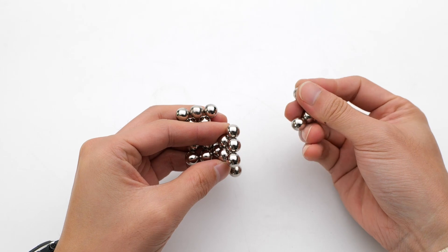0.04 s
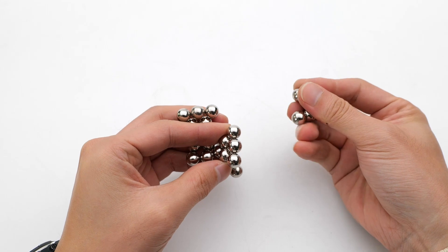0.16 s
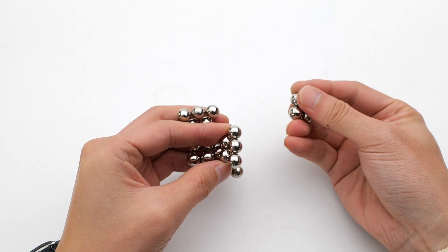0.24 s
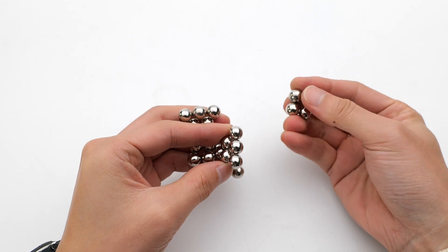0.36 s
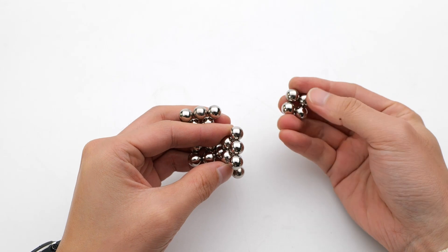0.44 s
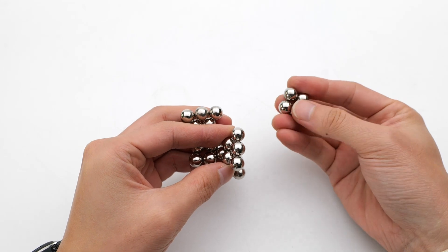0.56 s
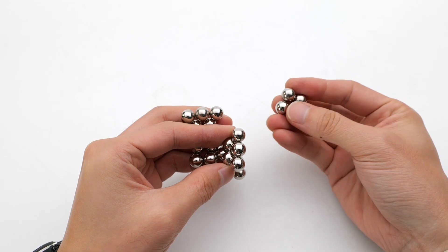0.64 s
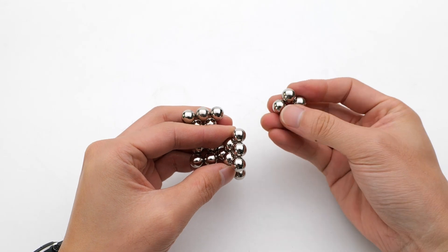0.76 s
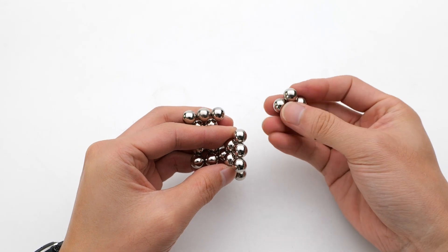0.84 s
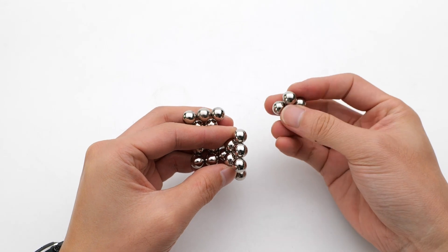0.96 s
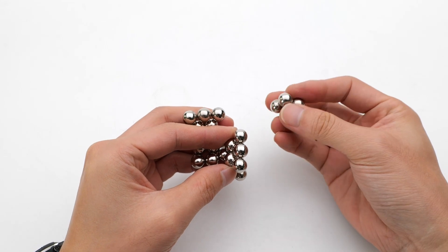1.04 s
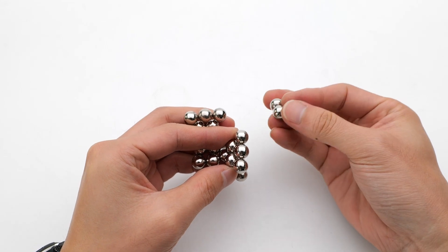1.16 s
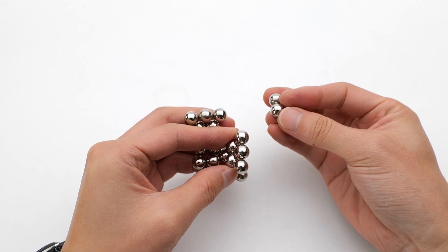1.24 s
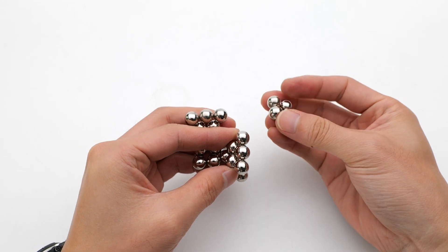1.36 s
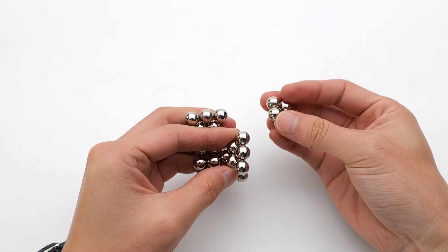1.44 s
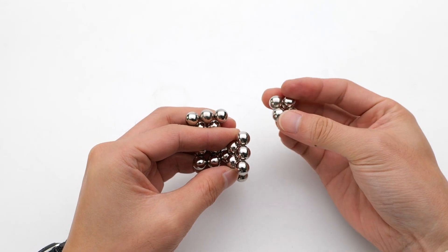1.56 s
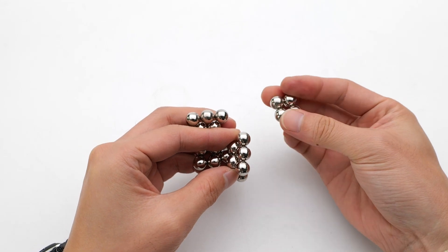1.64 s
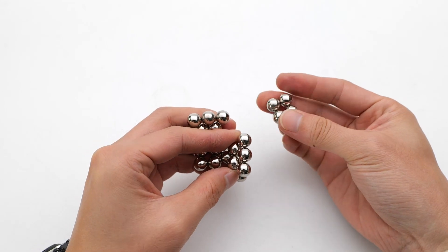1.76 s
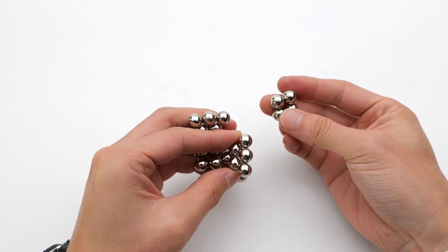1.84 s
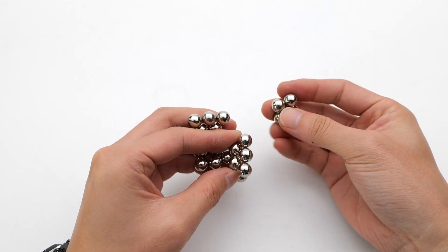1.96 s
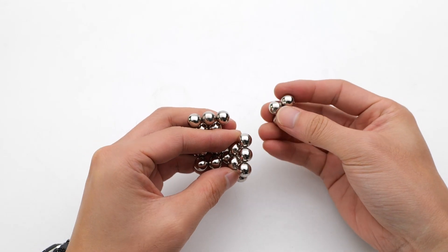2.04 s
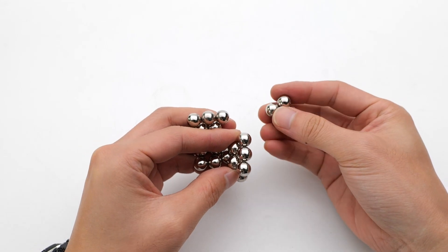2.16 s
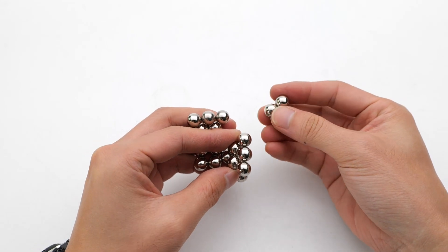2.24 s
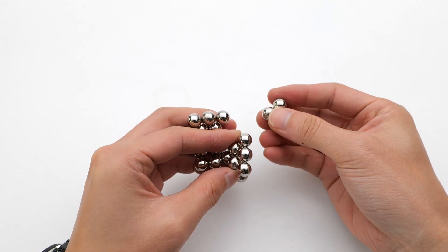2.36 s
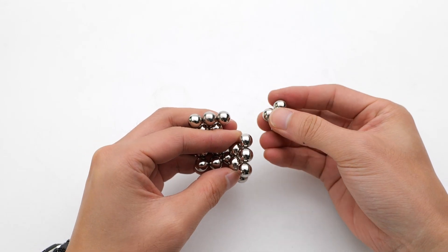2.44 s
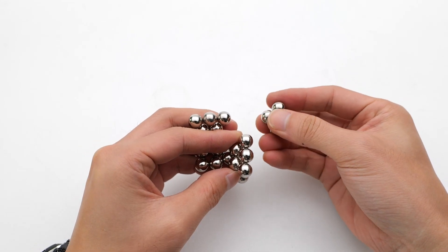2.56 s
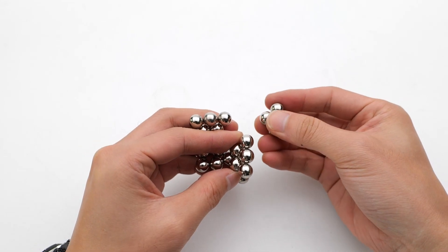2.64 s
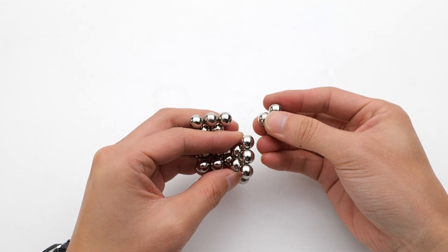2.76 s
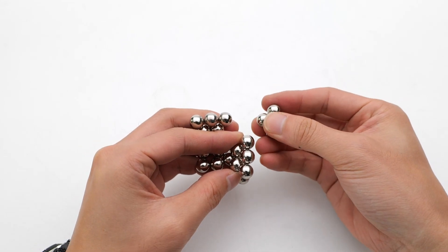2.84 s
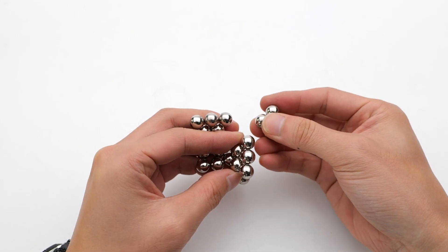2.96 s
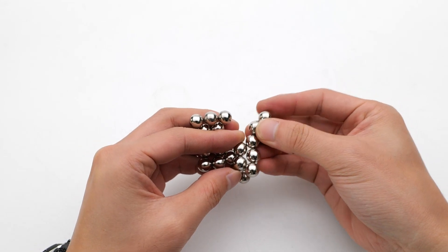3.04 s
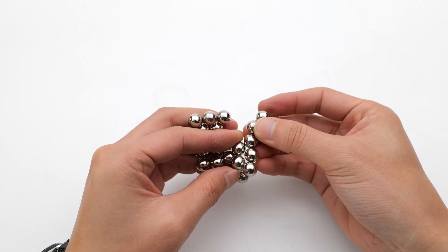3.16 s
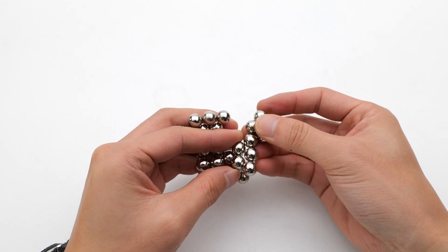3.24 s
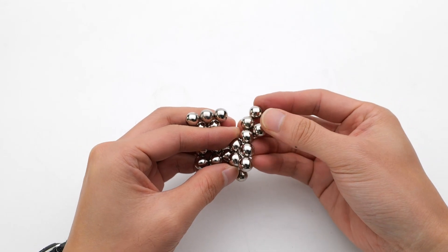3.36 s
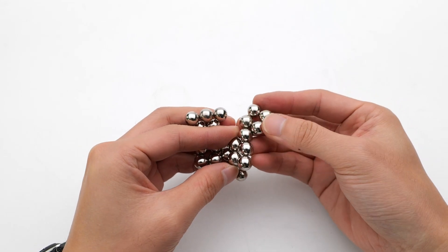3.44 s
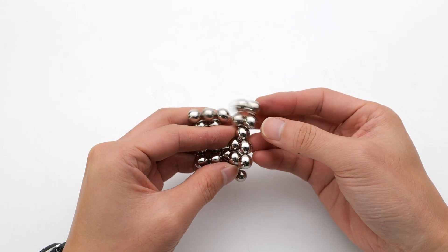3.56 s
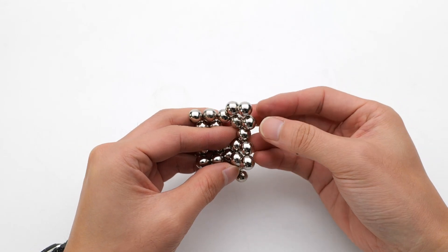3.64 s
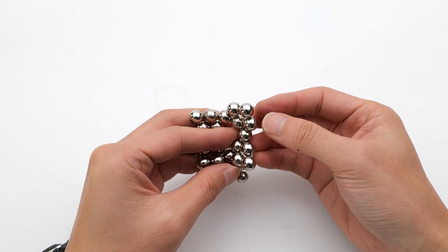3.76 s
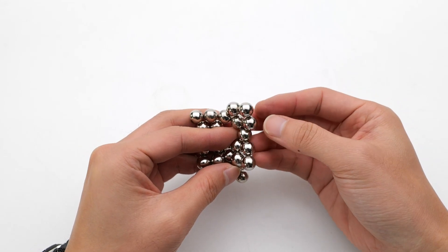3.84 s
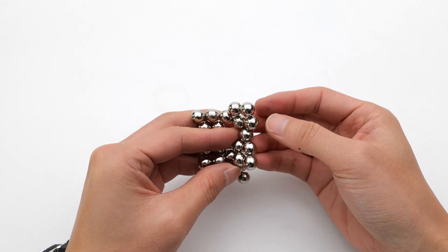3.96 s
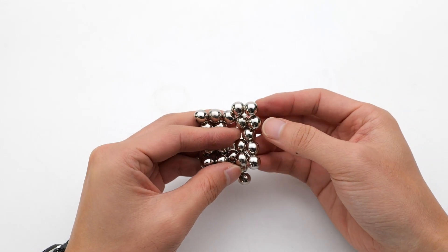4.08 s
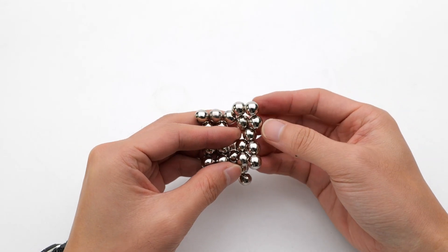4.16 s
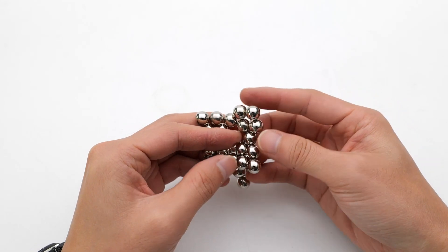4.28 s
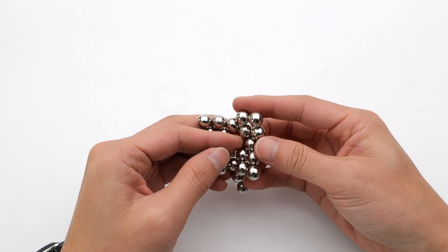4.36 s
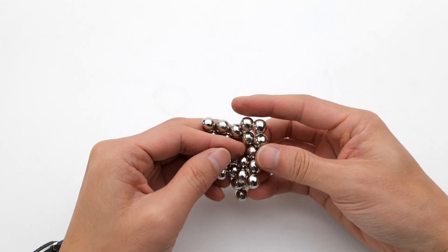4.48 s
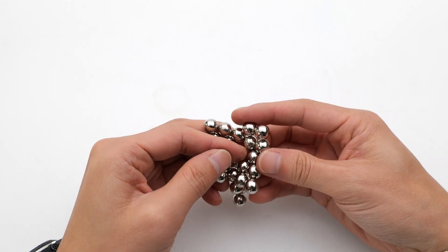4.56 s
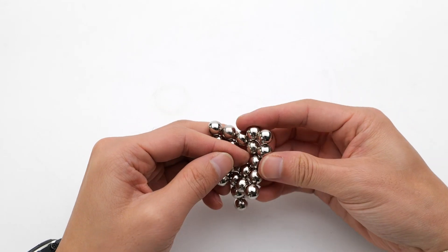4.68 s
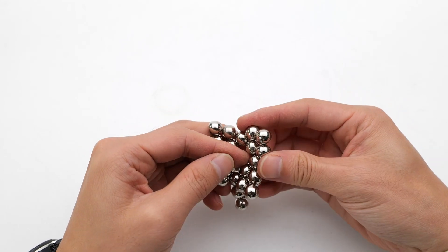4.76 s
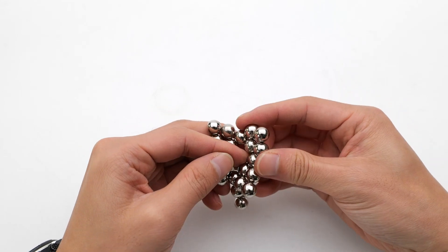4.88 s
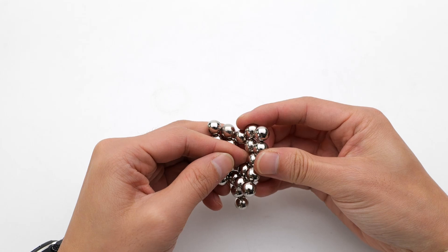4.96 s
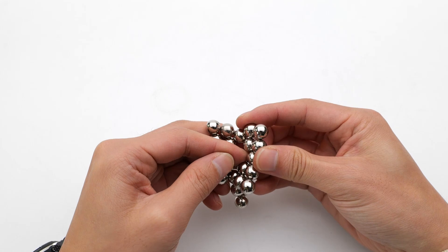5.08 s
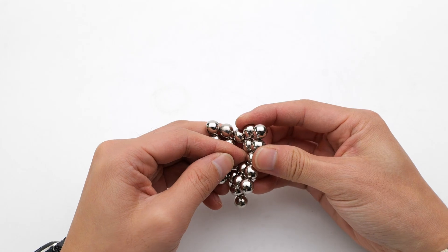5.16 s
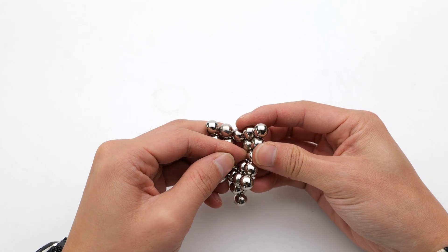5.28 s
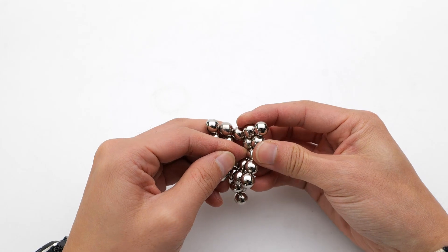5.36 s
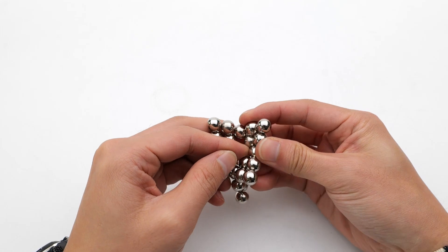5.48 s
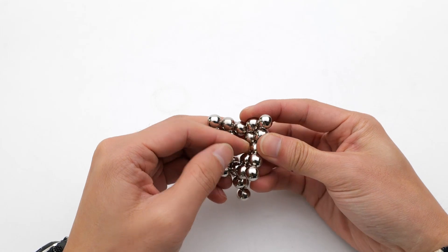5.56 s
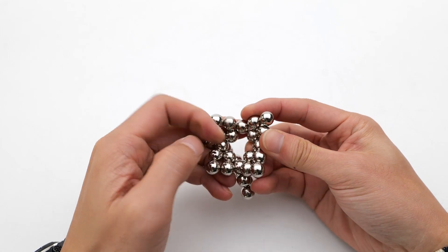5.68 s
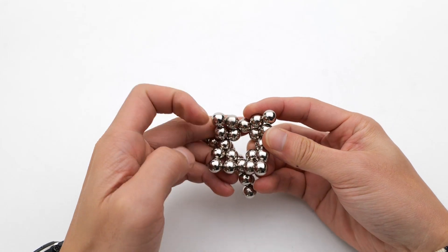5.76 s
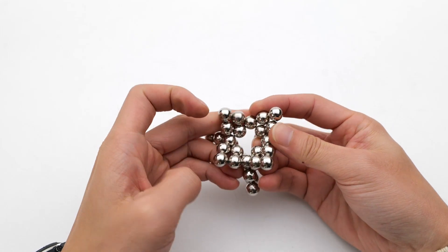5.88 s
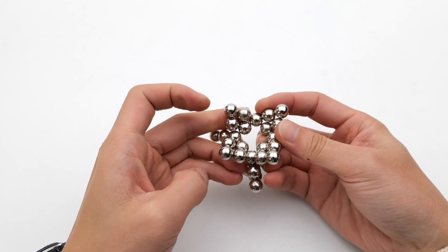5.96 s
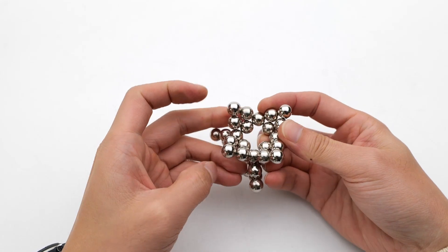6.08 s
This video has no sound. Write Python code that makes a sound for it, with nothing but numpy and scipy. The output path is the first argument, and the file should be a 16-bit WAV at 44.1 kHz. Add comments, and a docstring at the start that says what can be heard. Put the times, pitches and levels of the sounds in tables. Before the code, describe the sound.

A quiet small room with a very faint, steady fan noise, low hum and soft hiss. At about 0.27 s small magnetic steel balls snap together close to the microphone: a loud, piercing, bright metallic click made of several impacts within a few milliseconds, with quick reflections and a short roomy tail. Near silence follows until about 3.1 s, when a second hard snap hits, denser and more clattery. At about 3.65 s a third follows, a tight double-edged clack with a slightly clearer ring from the cluster of balls. Barely noticeable dull thuds and low hums from the table lie under and after the hard snaps. Quiet returns until about 5.36 s, when a much weaker, thin click sounds, then nearly imperceptible tiny ticks around 5.7 and 5.8 s. Only the faint fan and hiss remain to about 6 s.

```python
"""Small magnetic steel balls, brought together by hand above a table, snap close by in a small quiet room.
Each snap is a burst of impacts, mostly within a few ms, that excite damped rings and a ringing cluster.
Near surfaces echo it before a short diffuse tail; dull thuds lie under the snaps and faint low hums follow.
A fan makes resonance-shaped noise with wavering tones, mains hum among them, and each channel adds hiss."""
import sys
import numpy as np
from scipy import signal
from scipy.fft import rfft, irfft
from scipy.io import wavfile

SR = 44100
rng = np.random.default_rng(int(sys.argv[2]) if len(sys.argv) > 2 else 0)


def dump(signal):
    """Clip the signal to [-1, 1] and save it as 16-bit WAV at the path in sys.argv[1]."""
    limited = np.clip(np.atleast_2d(signal).T, -1, 1)
    pcm = np.round(limited * 32767).astype(np.int16)
    wavfile.write(sys.argv[1], SR, pcm)


N = 269960  # length in samples

# Each snap as a whole: start [t/s], bare tick relative to ring [level/dB], room answer [level/dB],
# spread of the contacts [0-1], chatter [level/dB], chatter length [t/ms], cluster pitch [f/Hz],
# cluster [level/dB], thud [level/dB]
SNAPS = [(.2676, -20, -2, 0, -31, 3.3, 5720, -29, -46), (3.1147, -13, -2, .83, -22, 2.3, 5150, -34, -38),
         (3.6485, -17, -1, .9, -24, 1.8, 4700, -20, -45), (5.3553, -15, -5.5, .6, -56, 1.8, 5300, -62, -70)]


def undb(db):
    """Decibel definition: an amplitude ratio is 10 to the power of level/20."""
    return 10 ** (np.asarray(db) / 20)


def fade(t, t60):
    """Exponential damping: the amplitude falls by 60 dB in the time t60."""
    return np.exp(-np.log(1000) * t / t60)


def add(out, s, x):
    """Superposition: mix x into out from time s in seconds."""
    i = int(s * SR)
    out[i:i + len(x)] += x[:len(out) - i]


def curve(points):
    """Spectral envelope: gain per FFT bin, interpolated in dB over log frequency."""
    hz, db = np.transpose(points)
    bin_hz = np.arange(N // 2 + 1) * SR / N
    return undb(np.interp(np.log(bin_hz + 1), np.log(hz), db))


def noise(gain, db):
    """Spectral shaping: white noise filtered by gain, then set to an rms level in dB."""
    x = irfft(rfft(rng.standard_normal(N)) * gain, N)
    return x * undb(db) / np.std(x)


def snaps():
    """Impact radiation: direct and reflected rings and ticks; small balls radiate little bass."""
    # Impacts of ball on ball: onset [t/s], ring [level/dB], ring pitch [f/Hz]
    contacts = [(.26752, 1, 9200), (.26755, -6, 14400), (.2678, -32, 2400), (.26845, -6, 11300),
                (.26895, -4, 9900), (.2695, -11, 13500), (.26992, -9, 12000), (.27065, -8, 9100),
                (3.11475, -10, 4800), (3.1150, -17, 2200), (3.11505, -4, 14500), (3.11515, 0, 8600),
                (3.1154, -1, 12500), (3.1158, -3, 10400), (3.1162, -4, 8500), (3.11625, -8, 14000),
                (3.1169, -14, 12000), (3.6464, -9, 6900), (3.6466, -2, 11000), (3.64695, -2, 14300),
                (3.6475, -11, 9000), (3.64845, -5, 7360), (3.6485, -24, 1500), (3.64885, -2, 11300),
                (3.6491, -5, 14500), (3.6500, -7, 9800), (5.35515, -28, 5700), (5.3552, -31, 2300),
                (5.3552, -21, 11200), (5.35535, -20, 14900), (5.3557, -26, 9000), (5.3563, -31, 12800),
                (5.682, -57, 4200), (5.81, -62, 3000)]
    # Modes of the ball cluster, like a chain: ratio to its pitch [1], level [dB], t60 [ms]
    cluster = [(.79, -12.5, 12), (.87, -10.5, 14), (.95, -4.5, 21), (1.01, 1, 20), (1.109, -7.5, 14),
               (1.38, -0.5, 18), (1.64, -0.5, 18), (1.98, -4, 14)]
    ring_t60_ms, direct_db = 2.4, 2.5
    room_side_db, side_top_hz = -23.5, 3000  # room answer that differs left and right, and its cutoff

    out, side = np.zeros(N), np.zeros(N)
    t = np.arange(SR // 16) / SR
    distance_s = np.abs(np.subtract.outer([c[0] for c in contacts], [s[0] for s in SNAPS]))
    nearest_snap = np.argmin(distance_s, axis=1)
    for k, (start, tick_db, wet_db, spread, chatter_db, chatter_ms, pitch_hz, cluster_db, _) in enumerate(SNAPS):
        shared, unlike = room(), room()
        # impacts: (onset s, ring dB, ring Hz, ring t60 ms, tick dB)
        main = [(s, db, hz, ring_t60_ms, db + tick_db)
                for (s, db, hz), nearest in zip(contacts, nearest_snap) if nearest == k]
        body = [(start, cluster_db + db, pitch_hz * ratio, t60_ms, cluster_db + db + tick_db)
                for ratio, db, t60_ms in cluster]
        impacts = main + body + chatter(start, chatter_db, chatter_ms)
        for j, (s, *how) in enumerate(impacts):
            sample_fraction_s = s * SR % 1 / SR
            direct = contact(np.maximum(t - sample_fraction_s, 0), *how)
            # the wider the spread, the more each main contact meets a room answer of its own
            own = room() if j < len(main) else shared
            answer = np.sqrt(1 - spread) * shared + np.sqrt(spread) * own
            answer = answer / np.sqrt(answer @ answer / (shared @ shared))  # equal energy
            add(out, s, undb(direct_db) * direct)
            add(out, s, undb(wet_db) * signal.fftconvolve(direct, answer))
            add(side, s, undb(wet_db + room_side_db) * signal.fftconvolve(direct, unlike))
    side = signal.sosfilt(signal.butter(1, side_top_hz, fs=SR, output="sos"), side)
    little_bass = signal.butter(2, 1300, "highpass", fs=SR, output="sos")
    return signal.sosfilt(little_bass, [out + side, out - side])


def contact(t, ring_db, hz, ring_t60_ms, tick_db):
    """Impulsive excitation: an abrupt stop gives a one-cycle tick and a quickly damped ring."""
    onset = 1 - np.exp(-t / .00006)
    ring = np.sin(2 * np.pi * hz * t) * fade(t, ring_t60_ms / 1000) * onset
    u = (t - .0001) / .00003  # time from the middle of the tick, in tick widths
    tick = u * np.exp(-u ** 2 / 2) * (t > 0)
    return undb(ring_db) * ring - undb(tick_db) * tick


def chatter(start, db, length_ms):
    """Repeated impact: neighbouring balls jump and reseat in random ticks, each with a very short ring."""
    impacts = []
    for when, size, pitch in rng.random((14, 3)):
        level_db = db + 6 * size
        impacts.append((start + when * length_ms / 1000, level_db, 4000 + 11000 * pitch, 1, level_db))
    return impacts


def room():
    """Reflection and reverberation: smeared early echoes, then a fast and a slow decay per band."""
    # Near surfaces: delay [t/ms], echo [level/dB]
    echoes = [(2.9, -24), (7.0, -7), (9.1, -14.5), (11.5, -22), (15.3, -16.5), (17.0, -14), (24.5, -25.5)]
    # Diffuse answer: band centre [f/Hz], early level [dB], early t60 [s], late level [dB], late t60 [s]
    tail = [(690, -36.5, 0.1, -50, 0.27), (1400, -29.5, 0.17, -38.5, 0.32), (2570, -39, 0.24, -40.5, 0.45),
            (4960, -29, 0.17, -37, .45), (8100, -30, 0.15, -50.5, 0.46), (11600, -35, 0.047, -49, 0.28),
            (14700, -30.5, 0.17, -48, 0.23)]

    t = np.arange(SR // 3) / SR
    h = np.zeros(len(t))  # impulse response without the direct sound
    for delay_ms, db in echoes:
        smear = .3 * rng.standard_normal(size=40) * fade(t[:40], .003)
        impulse = t[:40] == 0
        delay_s = (delay_ms + 0.089 * rng.standard_normal()) / 1000
        add(h, delay_s, undb(db) * (smear + impulse))
    for hz, early_db, early_s, late_db, late_s in tail:
        band = signal.butter(2, [hz / 1.3, min(hz * 1.3, .45 * SR)], "bandpass", fs=SR, output="sos")
        decay = undb(early_db) * fade(t, early_s) + undb(late_db) * fade(t, late_s)
        build_up = np.minimum(t / 0.0055, 1)
        h += signal.sosfilt(band, rng.standard_normal(len(t))) * decay * build_up
    return h


def table():
    """Damped modal vibration: low sines swell within about a cycle and die away."""
    # Dull knock under each snap: pitch [f/Hz], level relative to the snap's thud [dB], t60 [s]
    knock = [(108, -7, 0.087), (226, 1.5, .035), (370, -1, 0.027), (654, -4.5, 0.03)]
    # Low hums after the hard snaps, likely the table top: onset [t/s], pitch [f/Hz], level [dB]
    hums = [(.30, 99, -64.5), (3.117, 29.78, -54), (3.189, 105.3, -65), (3.65, 28.13, -56), (3.68, 77, -58)]
    hum_t60_s = 1.0

    out, t = np.zeros(N), np.arange(SR) / SR
    modes = [(snap[0], hz, snap[-1] + db, t60) for snap in SNAPS for hz, db, t60 in knock]
    modes += [(*hum, hum_t60_s) for hum in hums]
    for s, hz, db, t60 in modes:
        swell = 1 - np.exp(-t * hz / .5)  # time constant of half a cycle
        add(out, s, undb(db) * np.sin(2 * np.pi * hz * t) * fade(t, t60) * swell)
    return out


def fan():
    """Resonant flow noise: broadband air noise raised at duct resonances, with wavering tones."""
    # Spectral shape of the air noise: frequency [f/Hz], relative spectral level [dB]
    air = [(12, -31), (25, -3.5), (50, -10), (76, -13.5), (150, -10.5), (202, -6.5), (251, -17),
           (311, -11.5), (414, -19), (600, -21.5), (1080, -21.5), (2400, -31.5), (6000, -42.5),
           (9000, -68.5)]
    # Duct resonances: centre [f/Hz], width [f/Hz], level above the air noise [dB]
    duct = [(219.8, 28, 7.5), (507, 29, 9.5), (877, 21, 12), (1120, 52, 6), (1586, 20, 6)]
    # Mains hum and a higher tone: frequency [f/Hz], rms level [dB], rms wander [f/Hz]
    hum_tones = [(49.8, -70, 2.4), (1105.8, -82, 1.8)]
    # Air noise that differs left and right: frequency [f/Hz], level relative to the air noise [dB]
    air_side = [(20, -27), (60, -21), (110, -19), (200, -28.5), (380, -19.5), (700, -20.5), (1500, -22),
                (6000, -21)]
    air_db = -64  # rms

    f = np.arange(N // 2 + 1) * SR / N
    resonances = sum(undb(db) ** 2 / (1 + (2 * (f - hz) / width) ** 2) for hz, width, db in duct)
    gain = curve(air) * np.sqrt(1 + resonances)
    tones = np.zeros(N)
    for hz, db, wander_hz in hum_tones:
        drift = wander_hz * noise(1 / (1 + (f / 4) ** 2), 0)  # slow, below a few Hz
        phase = 2 * np.pi * np.cumsum(hz + drift) / SR
        tones += np.sqrt(2) * undb(db) * np.sin(phase)
    unlike = gain * curve(air_side)
    side = noise(unlike, air_db) * np.linalg.norm(unlike) / np.linalg.norm(gain)
    return noise(gain, air_db) + tones + side * np.array([[1], [-1]])


def scene():
    """Superposition: balls, table and fan add, all nearly alike in both channels."""
    return snaps() + table() + fan()


def record(dry):
    """Noise floor, overload and band limit: hiss per channel, clipped peaks, then a cut top."""
    # Spectral shape of the hiss: frequency [f/Hz], relative spectral level [dB]
    hiss_shape = [(20, -16), (200, -8), (700, -4.5), (2000, -5), (6000, -2.5), (14600, -3.5), (16000, -7)]
    hiss_db, top_hz = -74.5, 16500  # rms before the top is cut, and the cutoff

    hiss = np.array([noise(curve(hiss_shape), hiss_db) for _ in dry])
    low = signal.ellip(10, .2, 60, top_hz, fs=SR, output="sos")
    clipped = np.clip(dry + hiss, -1, 1)
    return np.clip(signal.sosfilt(low, clipped), -1, 1)


dry = scene()
out = record(dry)
dump(out)
```